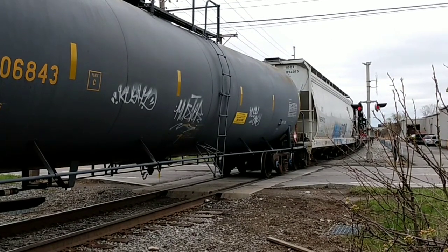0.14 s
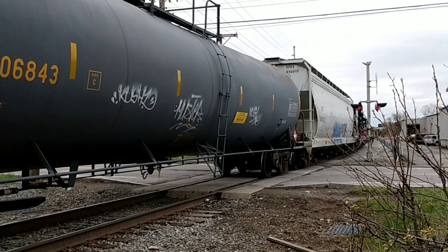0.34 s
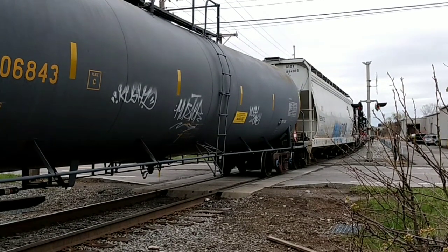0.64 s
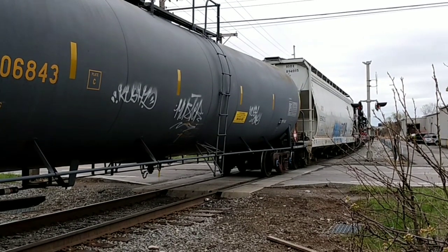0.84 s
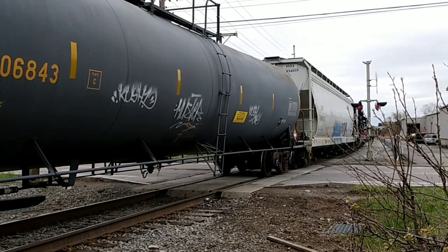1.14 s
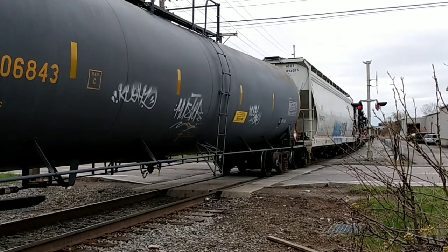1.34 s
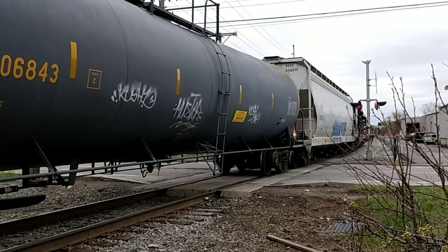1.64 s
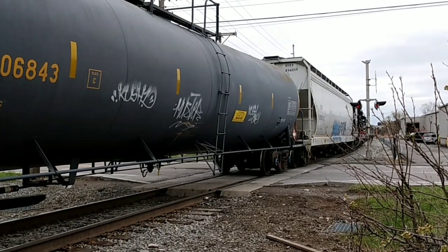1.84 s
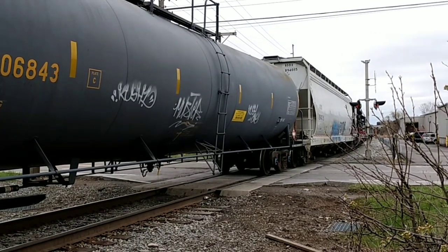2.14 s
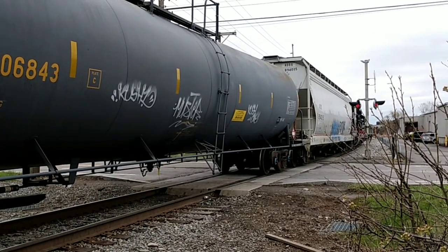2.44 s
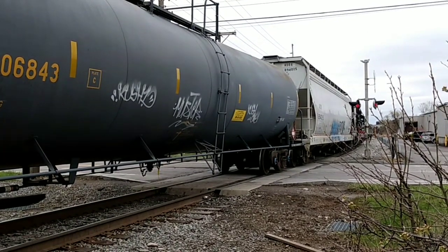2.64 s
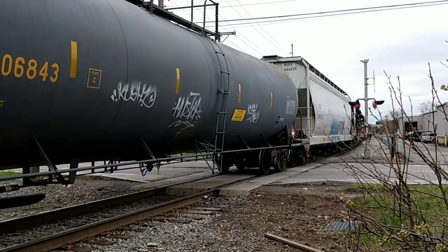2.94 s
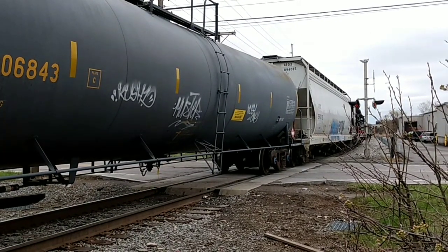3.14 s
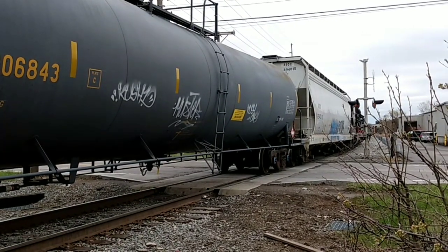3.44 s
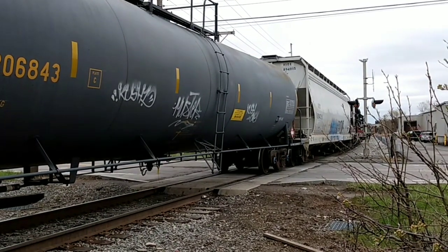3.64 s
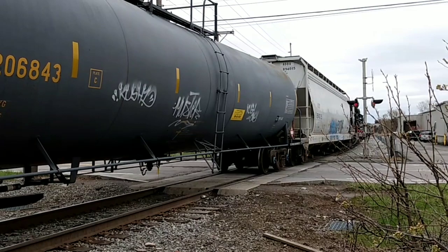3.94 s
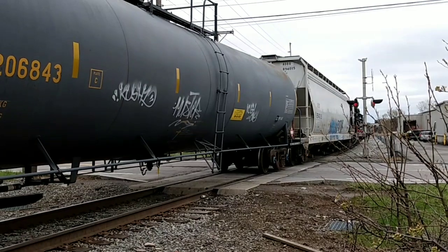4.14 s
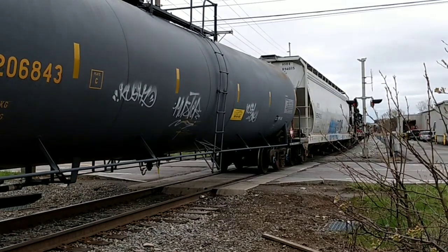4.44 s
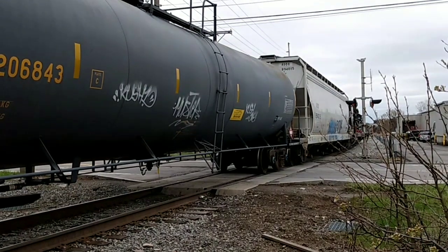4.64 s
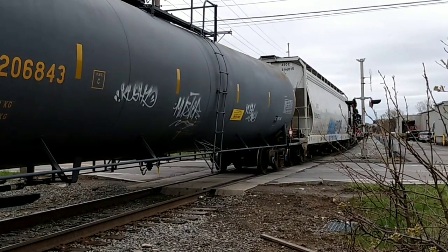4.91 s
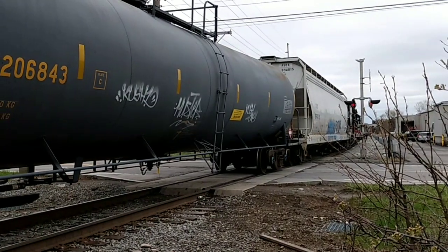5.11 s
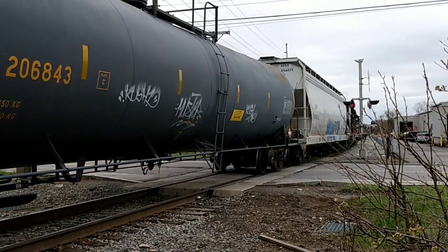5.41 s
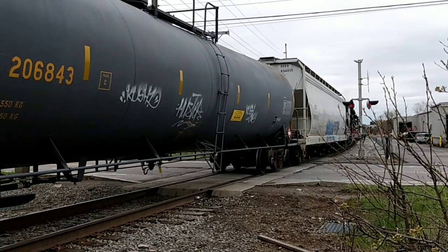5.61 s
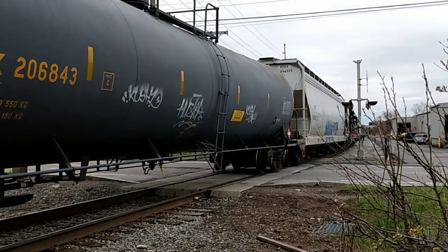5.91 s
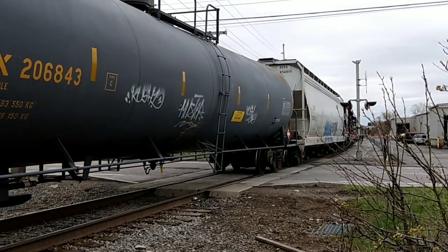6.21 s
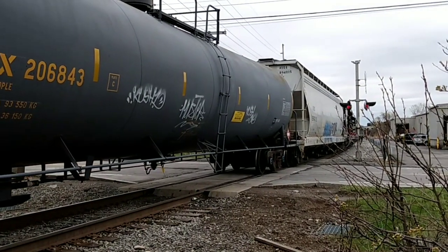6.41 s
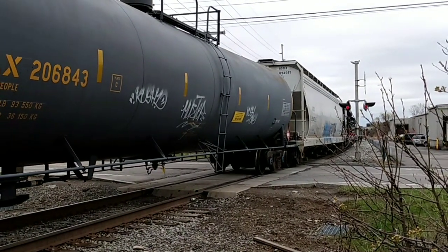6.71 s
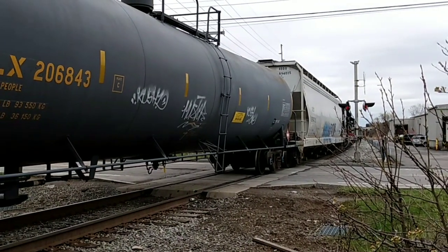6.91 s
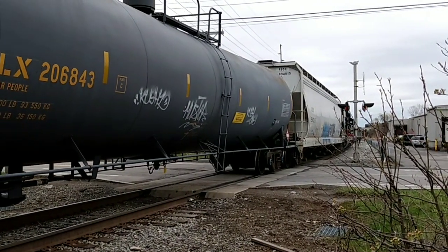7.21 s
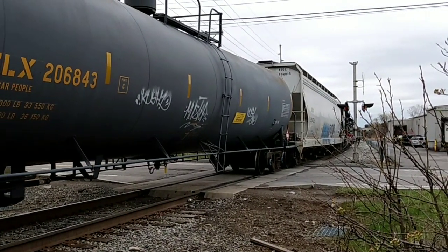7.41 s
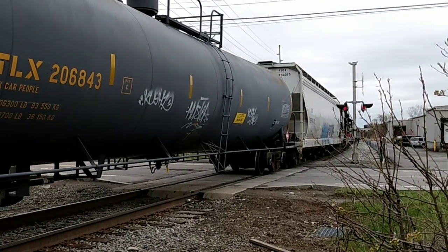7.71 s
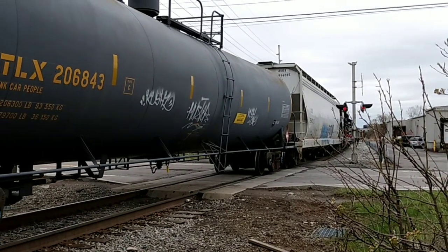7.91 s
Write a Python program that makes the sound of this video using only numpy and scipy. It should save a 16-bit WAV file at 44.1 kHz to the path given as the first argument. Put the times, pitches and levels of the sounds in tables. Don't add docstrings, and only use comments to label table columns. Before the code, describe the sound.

Two sharp air hisses over a faint outdoor hum, then freight couplers slam, frames clang and wheels screech, settling into wind thuds and a faint singing brake.

```python
import sys
import numpy as np
from scipy import signal
from scipy.fft import rfft, irfft, next_fast_len
from scipy.io import wavfile
from scipy.ndimage import uniform_filter1d, map_coordinates

SR = 44100
rng = np.random.default_rng(int(sys.argv[2]) if len(sys.argv) > 2 else 0)


def magnitude_from_level(level_db):
    exponent = np.asarray(level_db, float) / 20
    return 10 ** exponent


def dump(signal):
    limited = np.clip(np.atleast_2d(signal).T, -1, 1)
    pcm = np.round(limited * 32767).astype(np.int16)
    wavfile.write(sys.argv[1], SR, pcm)


N = 355446

# (time [s], level [dB])
ROLL = [(2.9, -88), (3.55, -76.5), (3.75, -35), (3.95, -45), (4.25, -68.5), (4.56, -68), (4.8, -71.5),
        (5.17, -44.5), (5.3, -29.5), (6.2, -36), (6.45, -40), (6.95, -44), (7.25, -61.5), (7.7, -61),
        (8.06, -64.5)]
# (frequency [Hz], likeness [-1..1], left lead [rad], left minus right [dB])
UP_TRAIN = [(300, 0.52, 1, 13.5), (1300, 0.66, -1.5, -14.5), (2420, 0.43, -1.3, 2), (8400, 0.46, -6, -2.5),
            (15600, 0.31, -12.5, -0.5)]
NEAR_CARS = [(60, 0.99, .05, 3.5), (337, 0.9, 0.47, 1.5), (1440, 0.55, 3.38, -5), (2574, 0.38, 11.15, 2.5),
             (7460, 0.26, 33.1, 1), (15040, .25, 66, 9)]


def unit(x):
    return x / np.sqrt(np.mean(x ** 2) + 1e-20)


def mid_rms(pair):
    return np.sqrt(np.mean(pair.mean(axis=0) ** 2))


def along(points, hz):
    f, v = np.transpose(points)
    return np.interp(np.log(hz + 1), np.log(f + 1), v)


def curves(rows):
    s, *cols = np.transpose(rows)
    return [np.interp(np.arange(N) / SR, s, c, left=-120, right=-120) for c in cols]


def wobble(rate_hz):
    knots = rng.standard_normal(int(N * rate_hz / SR) + 4)
    return map_coordinates(knots, [np.arange(N) * rate_hz / SR], order=2)


def smooth(field, bins, frames):
    return uniform_filter1d(uniform_filter1d(field, size=bins, axis=0), size=frames, axis=1)


def heard(spectrum, side, modes=(), patchy_db=-2.0, gritty_db=0., size=5):
    z = signal.stft(rng.standard_normal((2, N)), nperseg=1024)[2]
    field = smooth(rng.standard_normal(z.shape[1:]), size, 6)
    patches = magnitude_from_level(patchy_db * np.clip(unit(field), -2, 2))
    pair = signal.istft(z * patches, nperseg=1024)[1][:, :N]
    pair = pair * magnitude_from_level(gritty_db * wobble(350))
    m = next_fast_len(N + 8192)
    hz = np.fft.rfftfreq(m, 1 / SR)
    resonance = 1 + sum(4 * magnitude_from_level(2 * db) / (1 + (2 * (hz - c) / w) ** 2) for c, w, db in modes)
    gain = magnitude_from_level(along(spectrum, hz)) * np.sqrt(resonance) * (hz < 15780)
    f, *cols = np.transpose(side)
    alike, lead_rad, balance_db = [np.interp(hz, f, c) for c in cols]
    turn = np.arccos(np.clip(alike, -1, 1)) / 2
    a, b = rfft(pair, m) * gain * [np.cos(turn), np.sin(turn)]
    tilt = magnitude_from_level(balance_db / 2) * np.exp(.5j * lead_rad)
    out = irfft([(a + b) * tilt, (a - b) / tilt], m)[:, :N]
    return out / mid_rms(out)


def tilted(x, split_hz, low_db, high_db):
    out = 0
    for kind, db in (("low", low_db), ("high", high_db)):
        part = signal.sosfiltfilt(signal.butter(3, split_hz, kind, fs=SR, output="sos"), x)
        out = out + magnitude_from_level(db) * part / mid_rms(part)
    return out


def swells(rows, fall_db_per_s, under_db):
    s, *peaks_db, rise_s = np.transpose(rows)[:, :, None]
    t = np.arange(0, N / SR + .002, .002)
    levels_db = []
    for peak_db, fall, bed_db in zip(peaks_db, fall_db_per_s, under_db):
        below_db = np.where(t < s, 20 * (s - t) / rise_s, fall * (t - s))
        power = np.sum(magnitude_from_level(2 * (peak_db - below_db)), axis=0)
        levels_db.append(10 * np.log10(np.interp(np.arange(N) / SR, t, power) + magnitude_from_level(2 * bed_db)))
    return np.array(levels_db)


def outdoors():
    # (frequency [Hz], density [dB per Hz])
    hum_spectrum = [(13, -50.5), (22, -16.5), (68, -5), (118, -18), (133, -20), (267, -26), (438, -38),
                    (533, -36), (777, -38), (841, -33), (1000, -43.5), (2050, -48.5), (2500, -59.5),
                    (3250, -81.5), (5500, -120)]
    # (frequency [Hz], likeness [-1..1], left lead [rad], left minus right [dB])
    around = [(100, 0.99, 0.005, 0), (700, 0.0072, 0.016, 0.0056), (2990, 0.3, 0.0074, 0)]
    return magnitude_from_level(-53.5 + 0.8 * wobble(7)) * heard(hum_spectrum, around, patchy_db=3.0)


def buffet():
    # (frequency [Hz], density [dB per Hz])
    wind_spectrum = [(12, -21), (24, -4.5), (38, -6), (60, -22), (100, -120)]
    roll_db = np.maximum(curves(ROLL)[0], -70) + 50
    return magnitude_from_level(-57 + 0.4 * roll_db + 3 * wobble(1.6)) * heard(wind_spectrum, [(30, .6, 0, 4)])


def far_ringing():
    # (frequency [Hz], width [Hz], level [dB])
    far_modes = [(1620, 42, -3.5), (2072, 40, 3), (2940, 90, -1), (3770, 80, 0), (3870, 50, -4.5),
                 (6500, 110, -4.5), (7300, 90, -11.5)]
    # (time [s], level [dB])
    ringing_levels = [(0, -83.5), (0.3, -74.5), (1.3, -58), (1.6, -65), (1.9, -69.5), (2.3, -50), (2.85, -58.5),
                      (3.2, -75), (4.2, -75), (4.55, -75.5), (7.2, -70), (8.06, -64.5)]
    bands = [(c, w, db + 30) for c, w, db in far_modes]
    spectrum = [(300, -38.0), (500, 7), (7800, -2), (9000, -62.5)]
    return magnitude_from_level(curves(ringing_levels)[0]) * heard(spectrum, UP_TRAIN, bands, patchy_db=7.5, size=3)


def wind():
    # (time [s], peak [dB])
    puff_rows = [
        (6.051, -11),
        (6.785, -3),
        (6.848, -7),
        (6.926, -10.5),
        (6.996, -10.5),
        (7.431, -28),
        (7.7, -14),
        (7.782, -12),
        (7.83, -19),
    ]
    out, t = np.zeros(N + SR), np.arange(SR // 5) / SR
    port = 2 * np.pi * 114 * t
    push = np.sin(port) + 0.92 * np.sin(2.58 * port) * magnitude_from_level(-60 * t / 0.083)
    slap = 0.39 * np.sin(3.93 * port) * magnitude_from_level(-60 * t / 0.054)
    puff = (1 - np.exp(-t / 0.0034)) * magnitude_from_level(-60 * t / 0.078) * (push + slap)
    for s, db in puff_rows:
        out[round(s * SR):][:len(t)] += magnitude_from_level(db - 1.5) * puff
    return out[:N] * magnitude_from_level(np.array([[0], [-16]]))


def air():
    # (time [s], jet top [dB], body [dB], hold [s], sag [dB per s])
    blast_rows = [
        (0.259, -23, -38.5, 0.051, 20),
        (1.906, -27.5, -36, 0.19, 32.5),
    ]
    # (frequency [Hz], density [dB per Hz])
    jet_spectra = [
        [(410, -69.5), (700, -32), (981, -30.5), (1150, -24), (1430, -23.5), (1780, -16), (5970, -12),
         (7060, -6.5), (8040, -7), (10200, 2), (11100, -3), (14400, -8), (15600, -14)],
        [(410, -45), (700, -28), (829, -39), (1060, -15), (1570, -23.5), (1830, -12.5), (2280, -10), (3040, -9),
         (5170, -8.5), (7540, -2), (8150, -4), (9900, 0.5), (15600, -5.5)],
    ]
    # (frequency [Hz], width [Hz], level [dB])
    nozzle_modes = [
        [(10430, 170, -6.5), (9400, 146, -22), (11700, 200, -1.5), (2050, 100, -13), (2840, 160, -10),
         (3690, 110, -2)],
        [(7560, 120, 1), (10500, 200, -17), (11600, 200, 0), (1687, 150, 5), (6600, 200, -2.5)],
    ]
    body_fades = [0.56, 0.8]
    open_s, kick_db, kick_s = 0.009, 3, 0.018
    bend_db = 15.5
    echo_db, echo_fade_db_per_s, edge_fade_db_per_s = -42.5, 12, 20
    edge_sos = signal.butter(4, 1520, fs=SR, output="sos")
    out = 0
    for blast, fades, jet, nozzle in zip(blast_rows, body_fades, jet_spectra, nozzle_modes):
        s, top_db, body_db, hold_s, sag_db = blast
        t = np.maximum(np.arange(N) / SR - s, 0)
        late = np.maximum(t - hold_s, 0)
        open_db = 40 * np.log10(1 - np.exp(-t / open_s) + 1e-5)
        open_db += kick_db * np.exp(-((t - hold_s) / kick_s) ** 2)
        fall_db = sag_db * late + bend_db * late ** 3
        echo_power = magnitude_from_level(2 * (echo_db - echo_fade_db_per_s * t))
        tail_db = 10 * np.log10(magnitude_from_level(-2 * fades * fall_db) + echo_power)
        flow = heard(jet, UP_TRAIN, nozzle, patchy_db=1.6, gritty_db=1.0, size=3)
        edge = signal.sosfiltfilt(edge_sos, flow)
        flow = flow + edge * (magnitude_from_level(4 - edge_fade_db_per_s * t) - 1)
        out = out + tilted(flow, 6360, body_db + open_db + tail_db, top_db + open_db - fall_db)
    return out * magnitude_from_level(0.28 * wobble(25.15))


def shoe():
    # (time [s], frequency [Hz], level [dB])
    shoe_rows = [
        (7.05, 735, -70),
        (7.102, 695.7, -57),
        (7.206, 669.7, -61.5),
        (7.32, 695, -52.5),
        (7.5, 709, -51),
        (7.7, 700, -53),
        (7.936, 689, -54.5),
        (8.06, 700, -71),
    ]
    hz, db = curves(shoe_rows)
    phase = 2 * np.pi * np.cumsum(np.abs(hz) + 16 * wobble(90)) / SR
    sides = np.array([[.6], [-.6]])
    note = magnitude_from_level(2 * wobble(35)) * np.sin(phase + sides)
    other = magnitude_from_level(-10 + 5.6 * wobble(9)) * np.sin(phase + 2 * wobble(50) + sides)
    return np.sqrt(2) * magnitude_from_level(db + 3.0) * (note + other)


def thumps():
    # (time [s], level [dB], frequency [Hz])
    thump_rows = [
        (2.503, -31.5, 75),
        (4.139, -37, 69.3),
        (4.225, -36, 64.3),
        (4.962, -24.5, 72.3),
        (5.048, -22.5, 69),
        (5.39, -13.5, 79.3),
        (5.666, -12, 77.2),
        (5.93, -15, 85),
    ]
    t60_s, rise_s = 0.32, 0.0048
    out, t = np.zeros(N + SR), np.arange(SR // 2) / SR
    for s, db, hz in thump_rows:
        shape = magnitude_from_level(db - 60 * t / t60_s) * (1 - np.exp(-t / rise_s))
        out[round(s * SR):][:len(t)] += shape * np.sin(2 * np.pi * hz * t)
    return out[:N] * magnitude_from_level(np.array([[1.2], [-1.2]]))


def knocks():
    # (time [s], peak [dB], frequency [Hz])
    knock_rows = [(3.612, -14, 206), (3.659, -15.5, 153), (3.715, -14.5, 250), (4.003, -26.5, 248),
                  (5.218, -17, 373), (5.343, -8, 233), (5.533, -13, 183), (5.6, -14.5, 171),
                  (5.694, -14.5, 151), (5.719, -11.5, 307), (5.815, -8.5, 190), (5.905, -16, 182),
                  (6.054, -6, 172.3), (6.16, -13.5, 173), (6.214, -16, 166), (6.697, -20, 152)]
    t60_s, rise_s = .075, .004
    out, t = np.zeros(N + SR), np.arange(SR // 5) / SR
    for s, db, hz in knock_rows:
        blow = np.sin(2 * np.pi * hz * t) + 0.34 * np.sin(2 * np.pi * 1.55 * hz * t)
        shape = magnitude_from_level(db + 4.5 - 60 * t / t60_s) * (1 - np.exp(-t / rise_s)) ** 2
        out[round((s - .004) * SR):][:len(t)] += shape * blow
    return np.array([out[:N] * magnitude_from_level(.8), np.roll(out, 10)[:N] * magnitude_from_level(-.8)])


def cars():
    # (peak time [s], deep thud [dB],
    # heavy clang [dB], light clatter [dB], rise [s])
    jolt_rows = [(2.94, -79, -38, -52, 0.075), (2.88, -79, -48, -55, .03), (3.08, -76, -46, -51.5, 0.28),
                 (3.3, -63, -36, -46.5, 0.079), (3.5, -34, -38.5, -44.5, 0.033),
                 (3.585, -45, -38, -28.5, 0.02), (3.62, -32.5, -30.5, -25.5, 0.034),
                 (3.67, -25, -29.5, -25, 0.077), (3.72, -29.5, -35, -36, 0.066),
                 (3.82, -36, -44, -55, 0.074), (4.01, -40, -33, -36, 0.15),
                 (4.625, -65, -61.5, -38.5, 0.019), (4.67, -48, -39.5, -39, 0.047),
                 (4.7, -53, -41, -51, 0.033), (4.755, -46, -33.5, -31.5, 0.023),
                 (4.78, -47, -41, -44, 0.045), (4.82, -57, -38, -45, 0.047), (5.06, -47, -58, -42.5, 0.18),
                 (5.13, -46, -45, -41.5, 0.13),
                 (5.211, -30, -30, -36, 0.041), (5.262, -23, -23, -22.5, 0.042),
                  (5.3, -23, -29, -25.5, 0.067), (5.33, -30, -27, -22.5, 0.058),
                  (5.37, -24, -38.5, -30, .1), (5.46, -34, -41, -37.5, 0.081),
                  (5.54, -27.5, -37.5, -26.5, 0.081), (5.6, -23.5, -24.5, -29.5, 0.11),
                  (5.665, -23, -34, -27, 0.2), (5.74, -24.5, -31, -35, 0.13),
                  (5.81, -23.5, -33, -28, 0.067), (5.88, -29.5, -31.5, -25.5, 0.046),
                  (5.93, -22, -32, -27, 0.14), (6.06, -20.5, -24.5, -28.5, 0.038),
                  (6.18, -26, -28, -26.5, 0.047), (6.23, -31, -42, -31, 0.11), (6.29, -30, -50, -40, 0.13),
                  (6.45, -31.5, -42, -44, 0.18), (6.69, -32, -32.5, -35, 0.04),
                  (6.77, -26.5, -38, -47, 0.09), (6.9, -30, -42, -56, 0.14), (7.04, -42, -47, -54, 0.13),
                  (6.649, -30.5, -30, -34, 0.027), (7.13, -38.5, -63, -53, 0.71),
                  (7.31, -42.5, -51, -56, 0.019), (7.372, -51, -41, -44.5, 0.015),
                  (7.48, -49, -43, -52.5, .08), (7.58, -59, -54, -53, 0.026), (7.88, -54, -62, -53, 0.025),
                  (8.03, -64, -54, -47.5, .04), (7.78, -35.5, -57, -55.5, 0.1)]
    # (peak time [s], level [dB], rise [s])
    boom_rows = [(2.51, -38, 0.0097), (2.63, -46, 0.16), (3.13, -38.5, 0.27), (3.62, -28, 0.024),
                 (3.7, -37, .1), (4.15, -37, .05), (4.28, -51, 0.13), (4.62, -54, .05), (4.83, -36, 0.12),
                 (5.0, -32, 0.039), (5.14, -33, 0.11), (5.33, -20, .08), (5.43, -29, .15), (5.6, -19, .12),
                 (5.72, -25.5, .1), (5.82, -18.5, 0.21), (6.22, -24.5, 0.53), (6.65, -28.5, 0.026),
                 (6.95, -25.5, 0.19), (7.42, -37, 0.048), (7.77, -31, 0.11), (8.06, -28, 0.061)]
    # (time [s], left minus right [dB])
    lean_rows = [(6.55, -6), (6.8, 13.5), (7.0, 24), (7.6, 4.5), (7.77, 11), (8.06, 2)]
    # (frequency [Hz], density [dB per Hz])
    heavy_spectrum = [(76, -23.5), (130, -8.5), (183, -5.5), (302, -8), (419, -6.5), (477, -6), (642, -16),
                      (800, -7), (1040, -21.5), (1760, -120)]
    light_spectrum = [(380, -28.5), (650, -5), (915, 0), (1460, 2.5), (1820, 0.5), (2560, -8.5),
                      (3200, -15.5), (3600, -9.5), (4160, -14), (5600, -29), (7280, -48.5), (12300, -120)]
    tank_spectrum = [(18, -49), (32, -24), (48, -4.5), (62, 0), (76, 2.5), (90, -2.5), (113, -5),
                     (150, -3.5), (200, -27.5), (330, -120)]
    # (frequency [Hz], width [Hz], level [dB])
    frame_modes = [(176.7, 62, 0.5), (269.6, 22, 1), (333, 80, 0.5), (547, 45, -0.5), (646, 89, 3.5),
                   (910, 72, -3.5), (1040, 190, -2.5), (1357, 70, -5), (1730, 140, -4.5), (2190, 260, -4.5)]
    roll_frame_db = [0.5, -0.5, -3.5]
    jolt_fall = [120, 116, 134]
    boom_fall = [79]
    (roll_db,), (pan_db,) = curves(ROLL), curves(lean_rows)
    beds_db = [roll_db + db for db in roll_frame_db]
    deep_db, heavy_db, light_db = swells(jolt_rows, jolt_fall, beds_db)
    boom_db, = swells(boom_rows, boom_fall, [roll_db + 2])
    rattle = magnitude_from_level(wobble(45))
    heavy = heard(heavy_spectrum, NEAR_CARS, frame_modes, patchy_db=4.0, gritty_db=-0.8, size=1)
    heavy = tilted(heavy, 290, deep_db, heavy_db)
    light = heard(light_spectrum, NEAR_CARS, frame_modes, patchy_db=4.0, size=1)
    light = tilted(light, 2600, light_db, 1.232 * light_db - 3.5)
    lean = magnitude_from_level(np.clip(pan_db, -3, 12) * np.array([[.4], [-.6]]))
    drum = heard(tank_spectrum, NEAR_CARS, [(82.0, 24, 0.0026)], patchy_db=1.0)
    return rattle * (heavy + light) + lean * magnitude_from_level(boom_db + 0.25 * wobble(24)) * drum


def squeals():
    # (time [s], frequency [Hz], level [dB])
    squeal_rows = [(3.487, 5270, -54.5), (3.486, 6910, -45), (3.487, 11600, -41), (3.49, 2686, -45),
                   (3.501, 10540, -51), (3.71, 14800, -41), (4.75, 12400, -59), (4.75, 3280, -42),
                   (4.82, 3300, -52), (5.07, 3800, -49), (3.49, 3300, -51.5), (3.49, 4400, -54),
                   (3.495, 4900, -53), (7.875, 3400, -59), (7.875, 5100, -58), (3.26, 2600, -58),
                   (3.4, 2200, -63), (5.347, 11530, -32), (5.379, 3215, -28), (5.63, 3000, -24),
                   (5.39, 9930, -29), (5.405, 10670, -28), (5.434, 14450, -32.5), (5.809, 3840, -29.5),
                   (5.884, 3550, -31.5), (5.923, 7090, -21), (5.971, 10680, -32.5), (6.154, 11600, -34),
                   (6.174, 7650, -28), (6.174, 13460, -28), (7.99, 10100, -48), (7.875, 6800, -54),
                   (7.875, 7890, -50), (7.866, 14300, -44), (3.487, 9800, -53), (3.487, 12800, -50)]
    creak_rows = [(1.21, 740, -60), (2.98, 2100, -51.5), (3.4, 850, -50.5), (3.27, 342, -38),
                  (4.24, 2050, -64), (4.34, 3710, -63), (4.447, 2600, -65), (7.436, 355, -38),
                  (7.74, 1100, -58), (7.89, 3790, -59), (4.2, 760, -58), (4.66, 260, -41),
                  (4.76, 2000, -38), (4.76, 850, -36.5), (3.662, 1800, -26.5), (3.682, 2080, -27.5),
                  (3.61, 1960, -29), (5.32, 1950, -28), (4.62, 2050, -43), (5.1, 3100, -51),
                  (7.57, 1100, -62), (7.62, 1370, -57), (7.725, 3300, -66), (7.735, 3820, -69),
                  (7.875, 1750, -55), (7.323, 330, -37), (5.65, 1720, -31), (6.194, 1950, -35)]
    ring_rows = [(3.674, 5980, -29.5), (3.692, 7490, -40), (3.704, 12560, -30), (3.704, 11700, -29),
                 (3.81, 8900, -41.5), (5.39, 11700, -31), (5.4, 10770, -34.5), (5.431, 14570, -32),
                 (5.62, 11700, -37), (5.964, 10770, -42), (6.159, 11560, -33), (6.17, 7170, -31.5),
                 (6.191, 12870, -29.5), (3.501, 6000, -59), (3.49, 14000, -56)]
    notes = [(*row, 1) for row in squeal_rows + creak_rows] + [(*row, 2.76) for row in ring_rows]
    out, t = np.zeros((2, N + SR)), np.arange(SR // 4) / SR
    for s, hz, db, lasts in notes:
        lead, balance = rng.standard_normal(2)
        length_s = lasts * 0.038 * 2 ** ((-25 - db) / 36) * (6000 / hz) ** 0.33
        rough_db = -.45 * (db + 27.5) + 5 * (hz < 500)
        drift = np.cumsum(rng.standard_normal(len(t))) * 0.011 * magnitude_from_level(rough_db)
        fall_db = 6 * t / length_s + 10 * (t / length_s) ** 3
        shape = (1 - np.exp(-t / 0.0014)) * magnitude_from_level(db - 2.0 - fall_db)
        grip = np.interp(t * 32, np.arange(20), rng.standard_normal(20))
        tone = np.sin(2 * np.pi * hz * t + drift + np.array([[.5 * lead], [0]]))
        tone *= magnitude_from_level(np.array([[2.0 + 1.6 * balance], [-1.5]]))
        out[:, round(s * SR):][:, :len(t)] += np.sqrt(2) * shape * magnitude_from_level(3.5 * grip) * tone
    return out[:, :N]


def wheels():
    # (time [s], peak [dB], dull part [dB], top part [dB], t60 [s])
    skid_rows = [(3.49, -37, 0, -9, 0.83), (3.5788, -5.5, -9, -11, 0.28), (4.1116, -31, -21, -6, 0.73),
                 (4.572, -24.5, -10.5, -5, 0.22), (4.648, -38, 3, -8, 0.63), (4.7627, -28, -1, 0, 0.35),
                 (4.965, -31, -6.5, -2.5, 0.28), (5.196, -21, -7.5, -10, 0.36),
                 (6.6702, -26, 0.5, -13, 0.82), (6.7733, -33, -18, -2, 0.17),
                 (7.3, -57.5, 16.5, -27.5, 0.53), (7.3687, -47.5, -6, 7, 0.67), (7.482, -46, -7, 1.5, 0.65),
                 (7.869, -31, -10.5, 3.5, 0.28), (7.994, -47, 5, 7, 0.54)]
    # (peak time [s], bright [dB], dull [dB], rise [s])
    slide_rows = [(3.32, -62.5, -92, 0.24), (3.67, -25.5, -29.5, 0.038), (4.0, -43, -49, 0.36),
                  (5.25, -35.5, -40, 0.058), (5.3, -26, -28, .05), (5.384, -24, -26, 0.18),
                  (5.63, -20.5, -27.5, 0.088), (5.67, -35.5, -29.5, 0.14), (5.8, -27, -33, 0.051),
                  (5.892, -21.5, -25.5, 0.056), (6.08, -30, -37.5, 0.11), (6.176, -23.5, -27.5, 0.027),
                  (6.225, -25, -27.5, 0.1), (5.93, -33, -30, 0.074), (7.02, -55, -55, .2),
                  (7.15, -67, -64, 0.12), (7.75, -58.5, -70.5, .12)]
    slide_fall = [114.5, 147]
    scrape_levels_db = [-3.5, -4.5]
    scrape_grows = [1.33, 1.35]
    # (frequency [Hz], density [dB per Hz])
    bright_spectrum = [(3820, -13.5), (6500, -6.5), (7200, -6), (8010, -4), (11300, 2), (14800, -3),
                       (15600, -3)]
    dull_spectrum = [(1470, -11.5), (2500, 2.5), (3240, 3.5), (5010, 1), (7260, -4.5), (8000, -9),
                     (10400, -43), (17600, -120)]
    # (frequency [Hz], width [Hz], level [dB])
    wheel_modes = [(3240, 140, -10), (6310, 210, -2.5), (7090, 32, 2.5), (7470, 58, 1), (9250, 31, 3.5),
                   (9900, 36, -3.5), (10100, 54, -15), (11600, 41, -4.5), (12900, 60, -1), (13400, 67, 0)]
    roll_db = curves(ROLL)[0] + 35
    beds_db = [grows * roll_db - 35.0 + db for grows, db in zip(scrape_grows, scrape_levels_db)]
    bright_db, dull_db = swells(slide_rows, slide_fall, beds_db)
    power = magnitude_from_level(2 * np.array([bright_db - 2.5, dull_db, bright_db - 8.0]))
    t = np.arange(SR * 2 // 3) / SR
    after = t - .025
    for s, db, dull, top, t60_s in skid_rows:
        fall_db = 60 * np.maximum(after, 0) / t60_s + 3.16 * np.clip(after / 0.014, 0, 1)
        shape = (1 - np.exp(-t / 0.0016)) * magnitude_from_level(-fall_db)
        part = power[:, round((s - .004) * SR):][:, :len(t)]
        part += (magnitude_from_level(db - 13.0 + np.array([[-2.5], [dull], [top]])) * shape[:part.shape[1]]) ** 2
    middle_db, dull_db, top_db = 10 * np.log10(power)
    bright = heard(bright_spectrum, NEAR_CARS, wheel_modes, patchy_db=5.8, gritty_db=0.8, size=1)
    dull = heard(dull_spectrum, NEAR_CARS, wheel_modes, patchy_db=5.8, gritty_db=1.45, size=1)
    return tilted(bright, 11800, middle_db, top_db) + magnitude_from_level(dull_db) * dull


def scene():
    background = outdoors() + buffet() + far_ringing() + wind()
    train = air() + shoe() + thumps() + knocks() + cars()
    return background + train + squeals() + wheels()


def sparse(x, quiet_db, masked_db, spread_db, depth_db):
    # (frequency [Hz], width [Hz], level [dB])
    mic_dips = [(4700, 350, 2), (8300, 400, 6)]
    hz, _, z = signal.stft(x, SR, nperseg=1024)
    hz = hz[:, None]
    power = np.mean(np.abs(z) ** 2, axis=0)
    band_db = 10 * np.log10(np.abs(smooth(power, 9, 3)) + 1e-16)
    whim = smooth(rng.standard_normal(power.shape), 7, 40)
    total_db = 10 * np.log10(np.abs(uniform_filter1d(power.sum(axis=0), size=11)) + 1e-16)
    limit_db = np.maximum(quiet_db, total_db + masked_db) + spread_db * unit(whim)
    limit_db += sum(db * np.exp(-((hz - c) / w) ** 2) for c, w, db in mic_dips)
    lost = np.clip((limit_db - band_db) / 3, 0, 1) * np.clip(hz / 600 - 1.3, 0, 1)
    return signal.istft(z * magnitude_from_level(-depth_db * lost), SR, nperseg=1024)[1][:, :N]


def band_limit(x):
    return signal.sosfilt(signal.butter(12, 16670, fs=SR, output="sos"), x)


def record(dry):
    rounded = dry / (1 + np.abs(dry / .8) ** 4) ** (1 / 4)
    thin = sparse(rounded, quiet_db=-91, masked_db=-47, spread_db=6, depth_db=18)
    hiss = magnitude_from_level(-78.0) * rng.standard_normal(dry.shape)
    return band_limit(thin + hiss)


dry = scene()
out = record(dry)
dump(out)
```